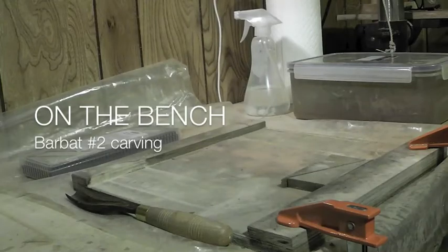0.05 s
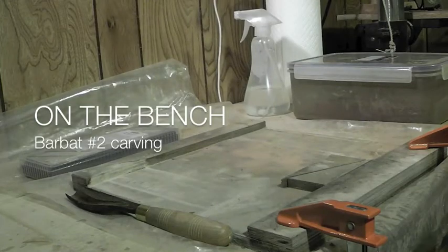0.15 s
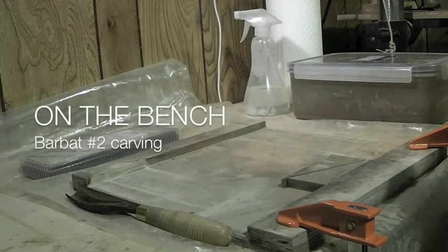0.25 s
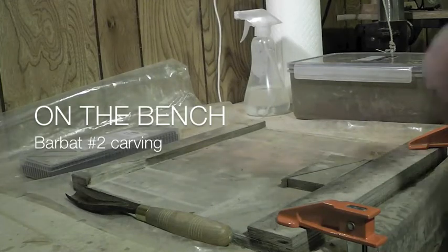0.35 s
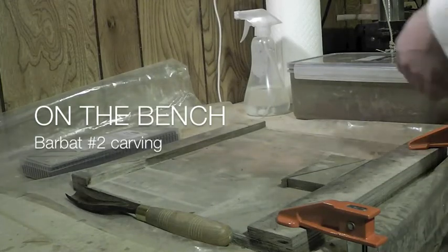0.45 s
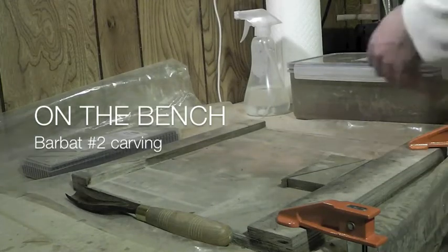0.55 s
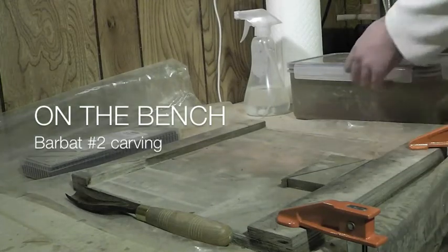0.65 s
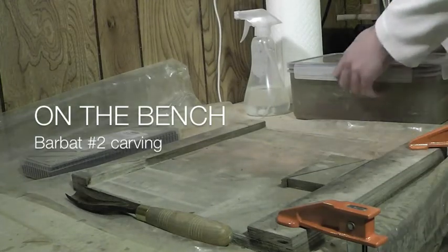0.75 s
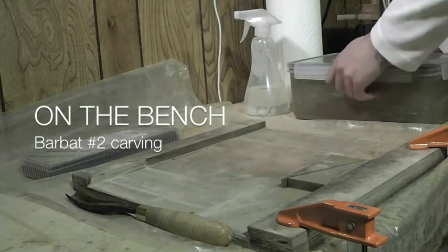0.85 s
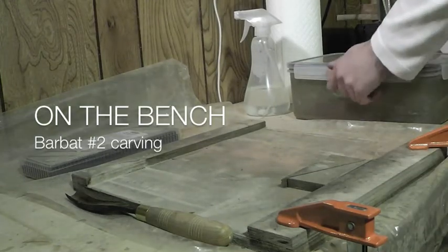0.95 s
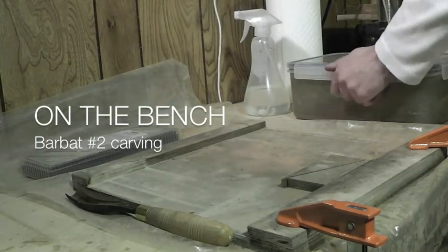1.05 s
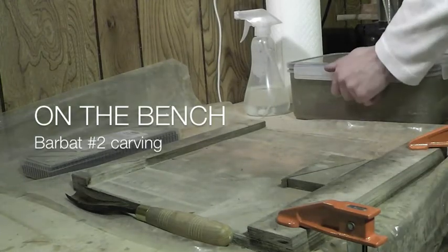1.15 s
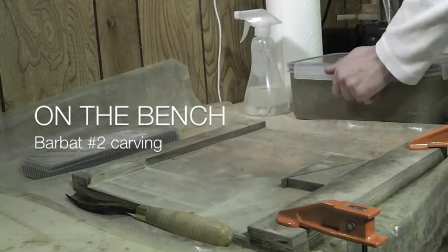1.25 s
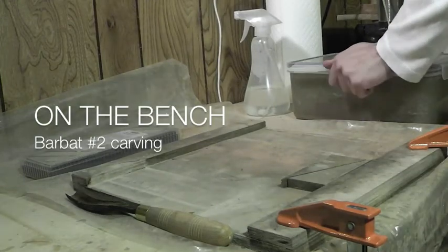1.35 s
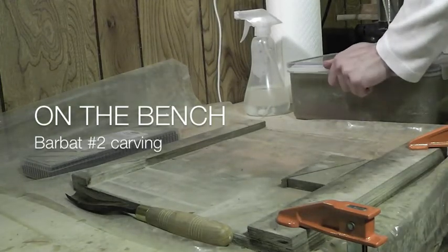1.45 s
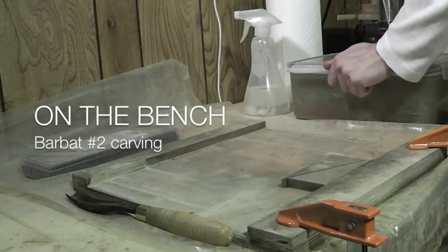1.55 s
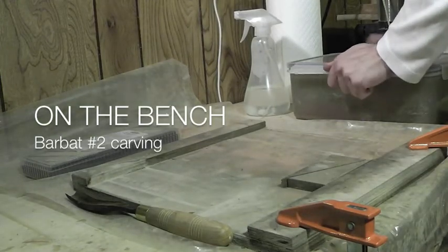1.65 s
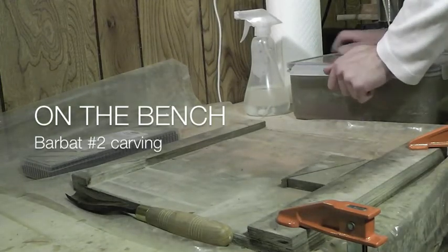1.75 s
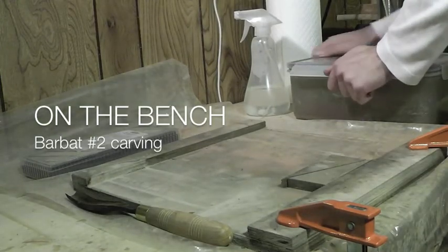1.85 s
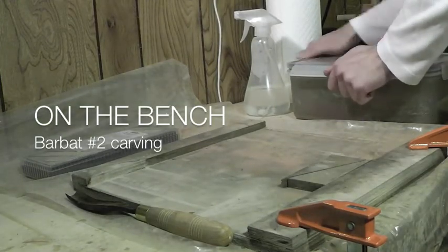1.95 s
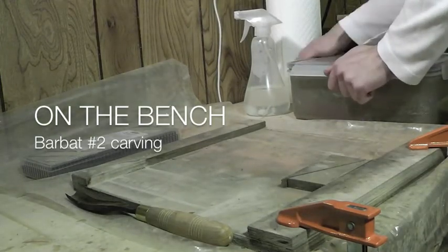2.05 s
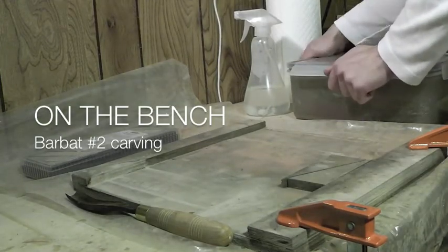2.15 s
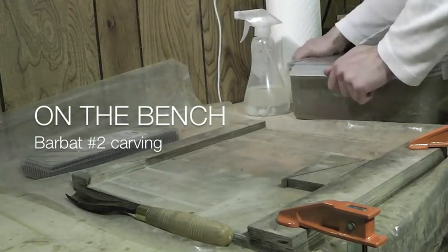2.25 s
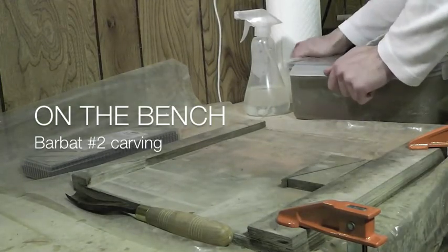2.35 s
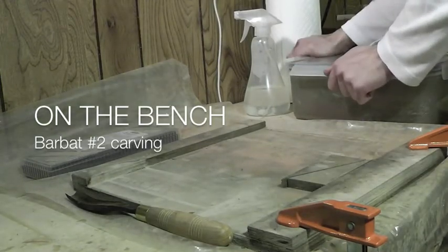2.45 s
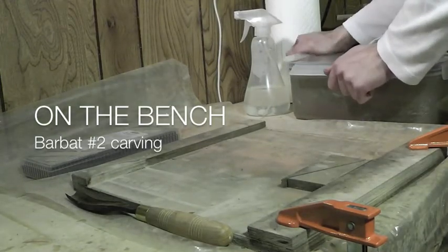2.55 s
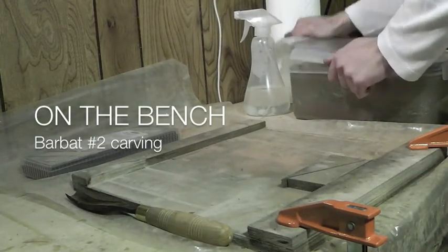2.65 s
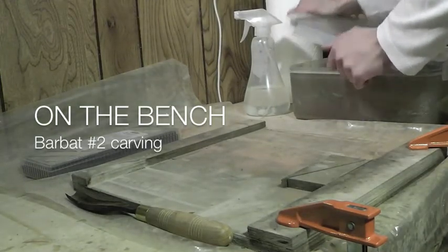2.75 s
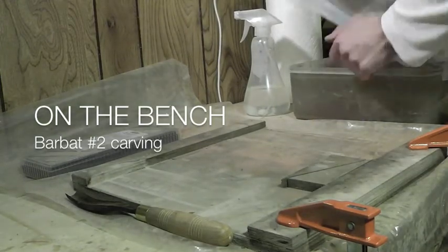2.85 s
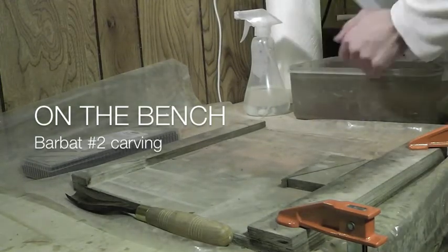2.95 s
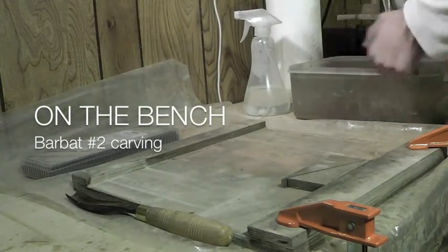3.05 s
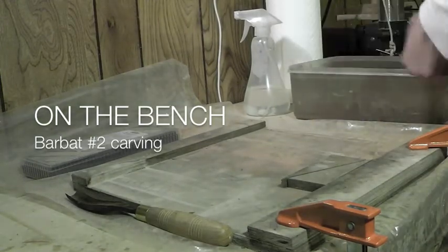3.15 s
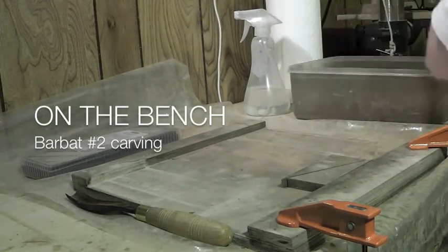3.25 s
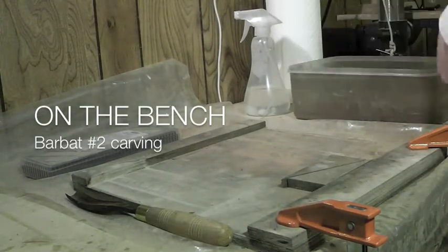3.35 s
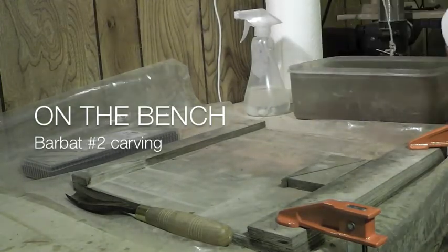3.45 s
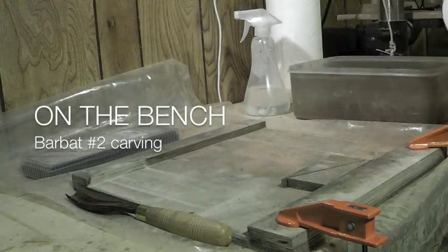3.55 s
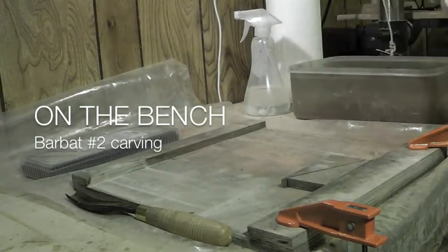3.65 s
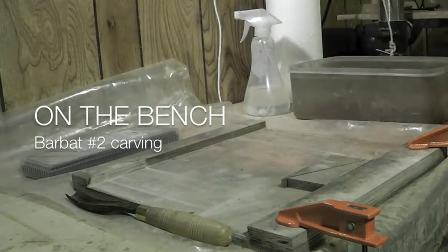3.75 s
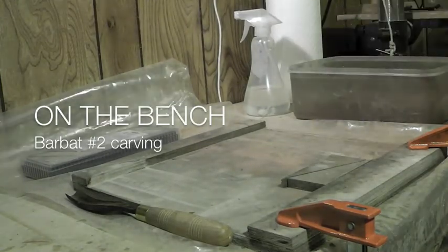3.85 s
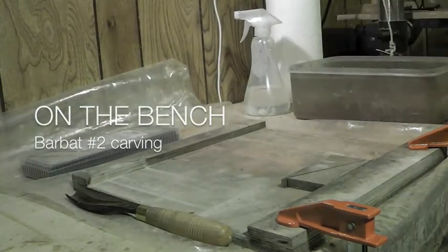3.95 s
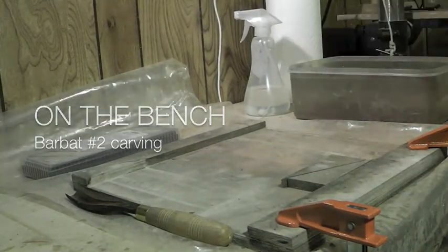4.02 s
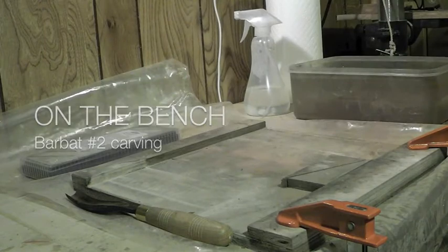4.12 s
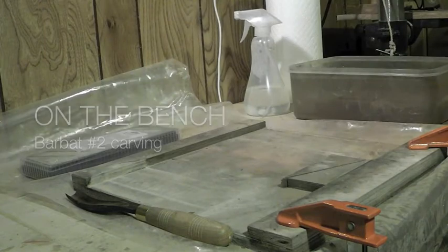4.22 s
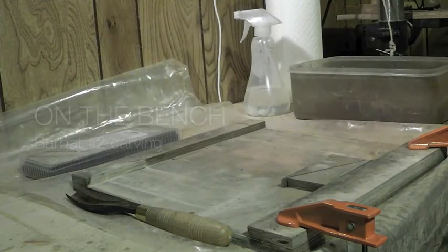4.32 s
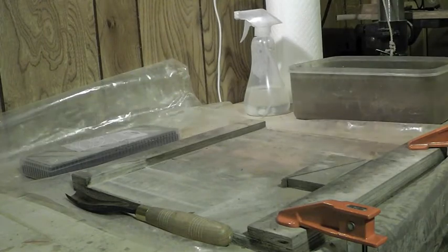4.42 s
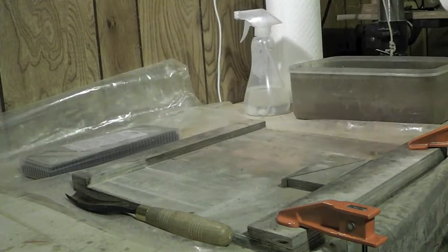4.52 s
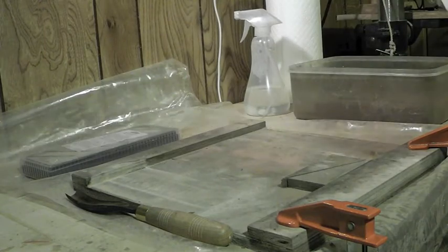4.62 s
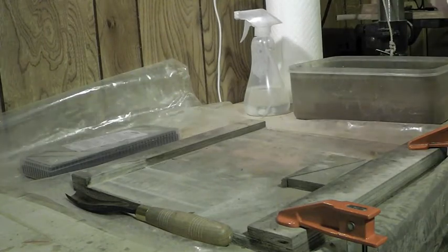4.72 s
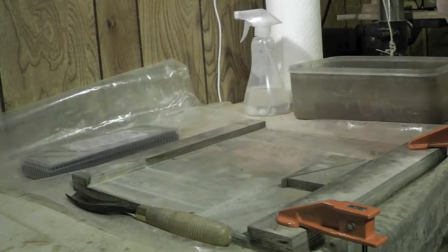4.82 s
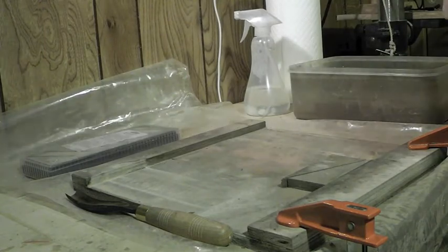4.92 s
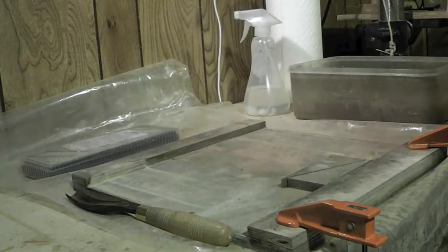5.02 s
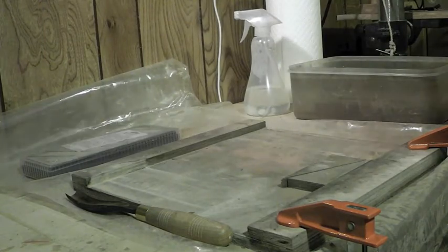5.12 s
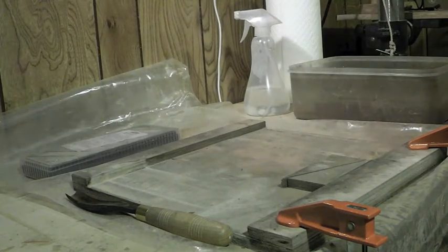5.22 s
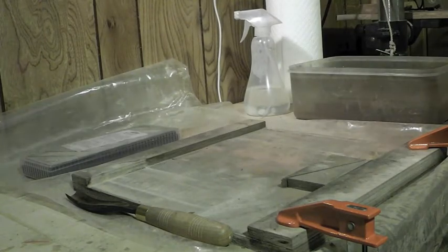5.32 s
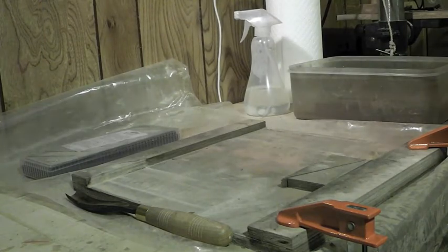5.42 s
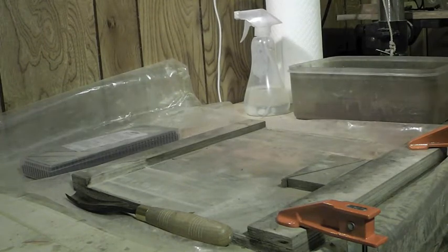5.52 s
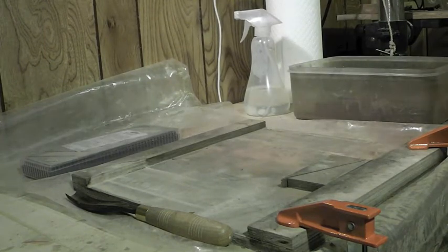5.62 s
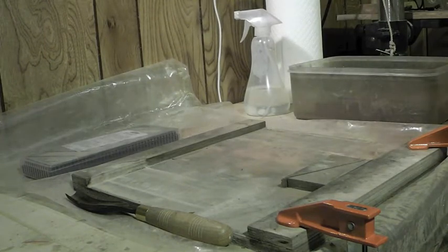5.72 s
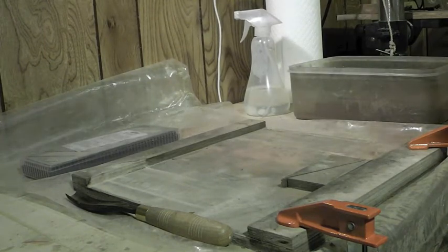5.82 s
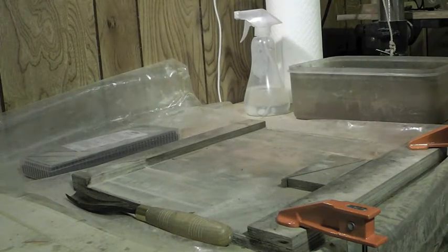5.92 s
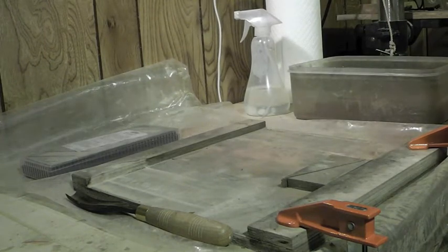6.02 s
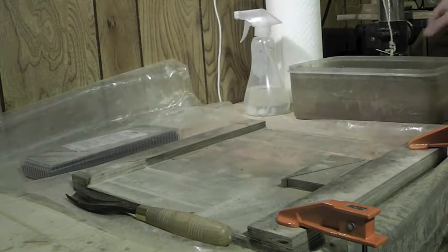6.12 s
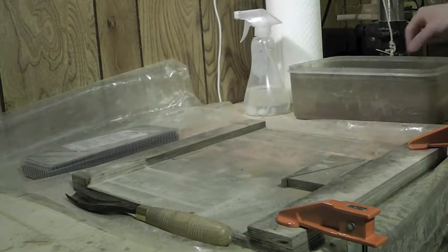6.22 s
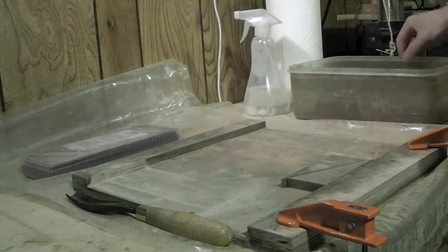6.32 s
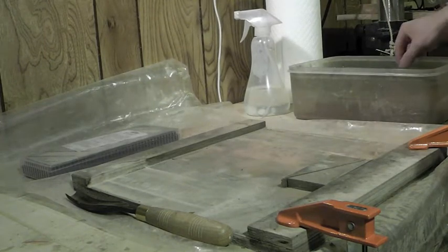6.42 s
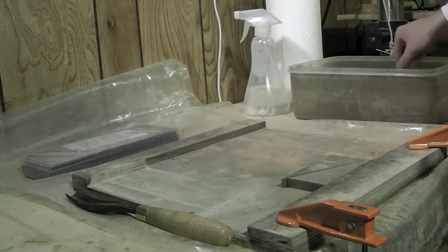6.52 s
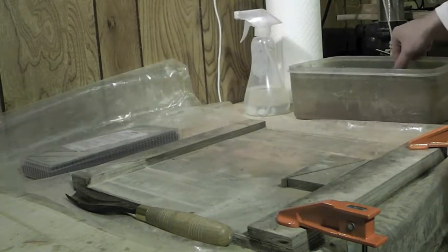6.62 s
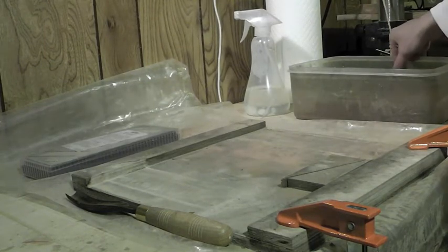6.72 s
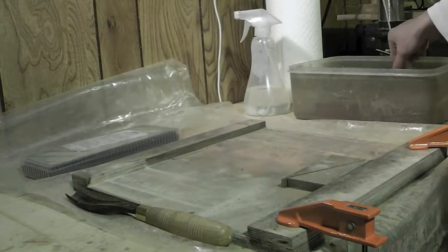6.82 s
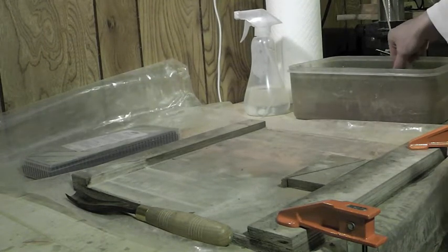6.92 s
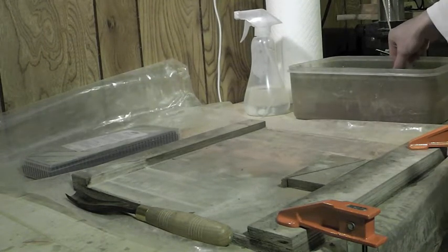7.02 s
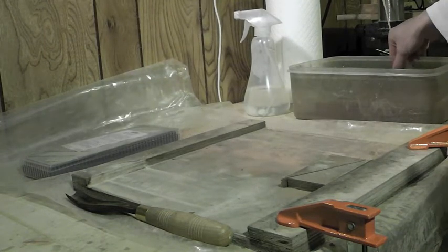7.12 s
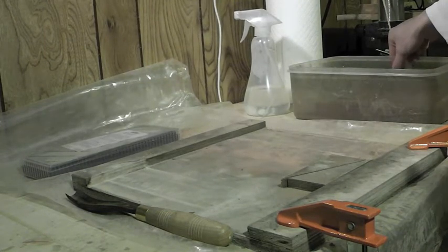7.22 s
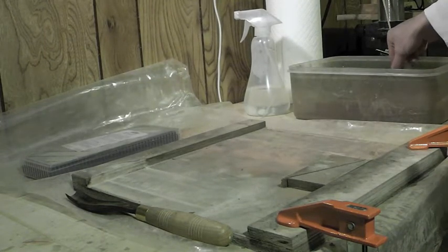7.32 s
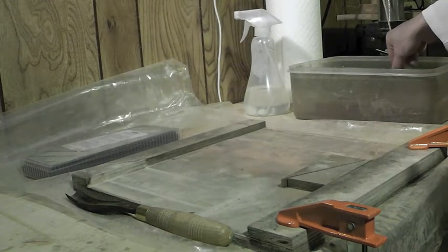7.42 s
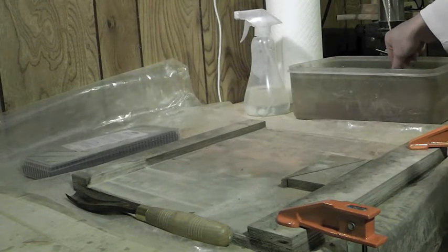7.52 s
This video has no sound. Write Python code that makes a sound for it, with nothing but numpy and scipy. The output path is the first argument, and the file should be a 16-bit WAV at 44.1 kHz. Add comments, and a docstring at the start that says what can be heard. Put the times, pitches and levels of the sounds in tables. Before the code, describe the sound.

Plastic box clips snap open sharply, then the lid scrapes off and clatters lightly down in a small, quiet room.

```python
"""A workshop bench: a plastic storage box's clips snap open, the lid scrapes off and is put down aside.
Each blow bends a plastic panel, rings the box and sprays a bright crack into a small wood-lined room.
Sliding plastic sticks and slips; sleeve fibres rustle as the arms move.
Behind it lie faint room noise and mains hum, and a low drone swells towards the end."""
import sys
import numpy as np
from scipy import signal
from scipy.fft import rfft, irfft, next_fast_len
from scipy.io import wavfile
from scipy.ndimage import uniform_filter1d

SR = 44100
rng = np.random.default_rng(int(sys.argv[2]) if len(sys.argv) > 2 else 0)


def inscribe(sig):
    """Save sig as 16-bit PCM at rate SR to the path in sys.argv[1].

    A 1-D sig is mono; a 2-D sig holds one channel per row.
    Samples are clipped to [-1, 1] before scaling.
    """
    pcm = np.round(np.clip(np.atleast_2d(sig).T, -1, 1) * 32767)
    wavfile.write(sys.argv[1], SR, pcm.astype(np.int16))


N = 334101

# bright crack of a contact: freq_hz, level_db
CRACK_SPECTRUM = [(800, -32.5), (2000, 2.5), (3000, -5.5), (4200, -4.5), (6500, -7.5), (10500, -3.5),
                  (12500, -11), (15500, -15.5)]


def clip_snaps():
    # start_s, knock_db, panel_hz, thump_db, thump_hz, clack_db, crack_db, after_db, slap_delay_s, aim_db
    snaps = [(1.319, 0, 714, -19.5, 247, -15, -26.5, -4, .026, -1),
             (1.390, 0, 620, -19.5, 232, -13, -27.5, -21, .012, 9.5),
             (2.330, -3, 690, -17, 176, -14.5, -20, -3, .016, 1)]
    release_hz, slap_hz, slip_db = 328.5, 275, -26
    rows = []
    for s, knock, panel_hz, thump, thump_hz, clack, crack, after, slap_delay_s, aim in snaps:
        spring_db, slap_db = after - 3.5, after - 8
        slip = (s - .0035, knock + slip_db, panel_hz, thump + slip_db, release_hz,
                clack + slip_db, crack - 18, 0)
        release = (s, knock, panel_hz, thump - 9, release_hz, clack, crack, aim)
        spring = (s + .006, knock + spring_db, panel_hz * .75, thump, thump_hz,
                  clack + spring_db, crack + after + 3, aim)
        slap = (s + slap_delay_s, knock + slap_db, panel_hz, thump + after + 1.5, slap_hz,
                clack + slap_db, crack + after - 13, aim)
        rows += [slip, release, spring, slap]
    return rows


def taps(panel_hz=660, hardness_db_per_octave=33, aim_db=2):
    """Light blows of fingers and lid; a harder contact clacks more and thumps higher."""
    # start_s, knock_db, thump_db, hardness_db, crack_db
    touches = [(0.358, -36, -44.5, -10, -76), (0.819, -32, -33.5, -27, -60),
               (0.842, -31.5, -36.5, -26.5, -66), (0.994, -39.5, -63, -8, -56), (1.126, -51, -59, 4, -59),
               (1.181, -42, -45.5, -3, -45), (1.194, -35, -43, -10, -68), (1.522, -24.5, -45, -32, -77),
               (2.143, -27, -43, -9, -44), (2.659, -52, -40.5, -7.5, -63), (2.679, -44, -54, -9, -46.5),
               (2.742, -46.5, -66, 6, -50), (2.782, -29.5, -68, -3.5, -43.5), (2.803, -43.5, -62, 6, -49),
               (2.839, -32.5, -47, -32, -59), (3.015, -20, -43.5, -12, -56), (3.034, -37, -58, -15, -43),
               (3.050, -32, -49, -8, -47), (3.078, -27, -39, -14.5, -50), (3.238, -28.5, -45.5, -7.5, -43),
               (3.551, -45.5, -62, -6, -62), (4.071, -44.5, -51.5, -1.5, -63),
               (5.412, -28, -63, -14.5, -65), (5.502, -41, -63, 2, -65)]
    rows = []
    for s, knock, thump, hardness, crack in touches:
        thump_hz = 269 * 2 ** (hardness / hardness_db_per_octave)
        rows.append((s, knock, panel_hz, thump, thump_hz, knock + hardness, crack, aim_db))
    return rows


def box_blows(contacts, ring_db=-50):
    """At each blow a panel swings, the whole box thumps and rings, the edges clack and crack."""
    # dull shove: freq_hz, level_db
    push_spectrum = [(30, -20), (85, -9.5), (125, -15), (165, 4.5), (250, -1), (370, -3.5), (600, -19.5),
                     (1500, -49)]
    # edge contact: freq_hz, level_db
    clack_spectrum = [(150, -20), (350, -2.5), (600, 0), (1050, 9.5), (1400, 7.5), (1800, -1.5),
                      (2250, -13.5), (2900, -21.5), (4000, -15), (6000, -21), (12000, -43.5)]
    out, ring = np.zeros((2, N)), box_ring()
    push, clack, crack = pulse(push_spectrum), pulse(clack_spectrum), pulse(CRACK_SPECTRUM)
    # panel and box radiate little below their lowest modes
    panel_highpass = signal.butter(3, 250, "high", fs=SR, output="sos")
    box_highpass = signal.butter(4, 140, "high", fs=SR, output="sos")
    for s, knock_db, panel_hz, thump_db, thump_hz, clack_db, crack_db, aim_db in contacts:
        dull = signal.sosfilt(box_highpass, amp(thump_db - 1) * swing(thump_hz, swell_s=.0031))
        knock = signal.sosfilt(panel_highpass, amp(knock_db - 3) * swing(panel_hz, swell_s=.00074))
        add(dull, 0, amp(thump_db + 17) * push)
        add(dull, .001, knock)
        for touch_s in (0, .0021 * rng.uniform(.7, 1.2)):  # the edge rebounds once
            add(dull, touch_s, amp(clack_db + 15) * clack)
        bright = np.zeros_like(dull)
        add(bright, 0, amp(crack_db + 16) * signal.fftconvolve(chatter(decay_s=.0033), crack))
        add(out, s, dull + amp(aim_db) * bright)  # aim: crack sent straight at the microphones
        add(out, s, amp(ring_db) * signal.fftconvolve(dull, ring))
        to_room = amp(-.5) * dull + amp(1) * bright  # the crack radiates sideways, so echoes more
        add(out, s, signal.fftconvolve(to_room[None], room_tail(), axes=1))
    return out


def box_ring():
    """Impulse response of the box with its trapped air."""
    # freq_hz, level_db, t60_s
    modes = [(168, -5, 0.32), (242.4, 1, 0.056), (280, -11, .18), (388, -3.5, 0.52), (452, -2.5, 0.39),
             (476, -2, 0.19), (601, -7, 0.39), (640, -6.5, 0.048), (717, -2, 0.35), (770, -10, 0.24),
             (947, 3, 0.37), (998, 1.5, 0.16), (1126, -4, 0.28), (1295, -10, 0.21), (1467, -3, 0.23),
             (2486, -1, 0.26), (2735, 5.5, .22)]
    t = np.arange(SR // 2) / SR
    return sum(amp(db - 60 * t / t60_s) * np.cos(2 * np.pi * hz * t) for hz, db, t60_s in modes)


def lid_landing():
    """The lid's hard rim clicks down further off, then its face clatters."""
    # touchdowns: start_s, level_db
    impacts = [(5.222, -31), (5.225, -22)]
    # lid face: freq_hz, density_db
    face_spectrum = [(88, -31), (150, -13), (314, -27.5), (359, -4.5), (487, -12), (545, 2.5), (812, -11.5),
                     (982, -2), (1160, -6.5), (1800, -11), (3370, -30.5), (4750, -27.5), (14000, -62)]
    # lid rim: freq_hz, level_db
    rim_spectrum = [(400, -38), (1000, -1), (1700, 9), (2800, -16), (4500, -7), (7000, -32), (12000, -29)]
    out, face = np.zeros((2, N)), pulse(face_spectrum)
    for s, db in impacts:
        clatter = amp(db + 15) * signal.fftconvolve(chatter(decay_s=.0064), face)
        add(out, s, with_echoes(clatter, room_db=1))
    s, db = impacts[0]
    add(out, s, with_echoes(amp(db + 13) * pulse(rim_spectrum), room_db=2.5))
    return out


def plastic_slides(ring_db=-54):
    """Fingers, clip and rim stick and slip; the slips ring the box and the lid flexes."""
    # plastic sliding: peak_s, level_db, rise_s, fall_s
    slide_strokes = [(0.362, -52.5, 0.063, .05), (0.822, -46.5, 0.044, 0.086), (1.004, -51.5, 0.055, 0.028),
                     (2.144, -50, 0.19, 0.17), (2.317, -43.5, 0.011, .025), (2.658, -39.5, 0.056, 0.031),
                     (2.785, -38.5, .075, 0.027), (3.06, -41, .05, 0.08), (5.28, -43.5, 0.025, 0.1),
                     (5.42, -46.5, 0.13, 0.12), (5.506, -46, 0.14, .17)]
    # freq_hz, density_db
    slide_spectrum = [(88, -45.5), (150, -7.5), (298, -6), (456, -10), (546, 1.5), (661, -8.5),
                      (1470, -9.5), (2580, -27), (4000, -37.5), (5200, -46), (8800, -120)]
    rub_strokes = [(1.005, -49, .016, .035)]
    # freq_hz, density_db
    rub_spectrum = [(900, -34.5), (1450, -7.5), (1900, -0.5), (2150, -4.5), (2500, -32), (5000, -43)]
    # flexing plastic sings: start_s, level_db, pitch_hz, swell_s
    flexes = [(2.657, -32.5, 326, 0.0027), (2.741, -38.5, 560, 0.0079), (2.780, -26, 592, 0.005),
              (3.240, -34, 406, 0.0035), (5.408, -38.5, 561, 0.01)]
    slips = tinted(grains(per_s=700, spread_db=1), slide_spectrum) * strokes(slide_strokes) * amp(-2)
    rub = tinted(grains(per_s=2900, spread_db=1.5), rub_spectrum) * strokes(rub_strokes)
    ring = amp(ring_db) * signal.oaconvolve(slips, box_ring())[:N]
    out = rub + in_room(slips + ring, room_db=.5)
    for s, db, hz, swell_s in flexes:
        add(out, s, with_echoes(amp(db) * swing(hz, swell_s), room_db=-7))
    return out


def sleeves(folds_db=2.5):
    """Cloth fibres hiss and tick as the arms move; folds catch and let go."""
    # arm movements: peak_s, level_db, rise_s, fall_s
    arm_strokes = [(0.55, -63.5, 1.5, 0.74), (0.845, -54.5, 0.14, 0.11), (0.96, -62.5, 0.22, .5),
                   (1.757, -48.5, 0.093, 0.041), (1.95, -53, 0.41, 0.22), (2.14, -50, 0.18, 0.082),
                   (2.68, -57.5, 0.21, 0.088), (2.76, -45, 0.091, 0.047), (3.03, -57, 0.51, 0.23),
                   (3.4, -62, 0.28, 0.028), (3.465, -55.5, 0.033, 0.05), (3.65, -56.5, 0.31, 0.39),
                   (4.075, -57.5, 0.25, .055), (4.17, -59.5, 0.059, 0.16), (4.32, -61.5, 0.18, .14),
                   (5.45, -50.5, 0.18, 0.16), (5.97, -64.5, 0.33, 0.11)]
    # freq_hz, density_db
    cloth_spectrum = [(180, -39), (300, -3), (454, -4.5), (582, 3), (911, -8), (1010, -1), (1170, -9),
                      (1770, -4), (3160, -27.5), (3990, -11), (7010, -12), (11000, -9.5), (15800, -17.5)]
    # cloth sweeping fast over plastic: peak_s, level_db, rise_s, fall_s
    sweeps = [(1.895, -50.5, 0.11, 0.23), (2.005, -55, 0.16, 0.046), (4.02, -63.5, .12, 0.35)]
    # freq_hz, density_db
    sweep_spectrum = [(4000, -20), (8000, -7), (11000, -2), (13000, -3.5), (15800, -15)]
    # cuff and fingers: start_s, level_db
    ticks = [(3.1807, -52), (3.4521, -63), (3.8194, -52), (4.27, -52), (4.3804, -44)]
    folds = unit(uniform_filter1d(uniform_filter1d(rng.standard_normal(N), size=700), size=500))
    fibres = tinted(grains(per_s=7400, spread_db=.5), cloth_spectrum)
    cloth = fibres * strokes(arm_strokes) * amp(folds_db * folds - 1)
    cloth += tinted(rng.standard_normal(N), sweep_spectrum) * strokes(sweeps) * amp(1)
    for s, db in ticks:
        add(cloth, s, amp(db + 13) * signal.fftconvolve(chatter(decay_s=.0027), pulse(CRACK_SPECTRUM)))
    return in_room(cloth, room_db=.5)


def drone(start_s=4.74, swell_s=.97, full_db=-55):
    """Noise in a few low, narrow resonances swells up."""
    # centre_hz, width_hz, level_db
    resonances = [(83.4, 20, -4.5), (167, 36, -1.5), (194.2, 4.2, -2.5), (254, 13, -1), (433, 44, -18.5),
                  (580, 13, -8), (697, 87, -16.5), (970, 83, -27)]
    size = next_fast_len(N)
    shape = sum(amp(db) / (1 + ((bins(size) - hz) / width_hz * 2) ** 2) for hz, width_hz, db in resonances)
    noise = unit(irfft(rfft(rng.standard_normal(size)) * shape, size)[:N])
    running_s = np.maximum(np.arange(N) / SR - start_s, 0)
    return noise * amp(full_db) * (1 - np.exp(-running_s / swell_s))


def room_noise(noise_db=-56, hum_hz=60, hum_db=-70.5):
    """Steady noise with a trace of mains hum."""
    # freq_hz, density_db
    noise_spectrum = [(12, -24.5), (20, -7), (65, -7.5), (90, -17.5), (145, -14.5), (167, -9.5),
                      (247, -11.5), (375, -19), (586, -15), (775, -18.5), (843, -17.5), (1890, -25),
                      (2430, -39), (5950, -33), (15800, -38)]
    # left to right: freq_hz, correlation
    noise_coherence = [(60, 0.73), (250, 0.19), (700, -0.085), (1500, -0.48), (6000, -0.23), (12000, -0.25)]
    noise = tinted(mic_pair(rng.standard_normal((2, N)), noise_coherence), noise_spectrum)
    hum = np.sqrt(2) * np.sin(2 * np.pi * hum_hz * np.arange(N) / SR)
    return amp(noise_db) * noise + amp(hum_db) * hum


def room_tail(gap_s=.0036, build_s=.0018, early_s=.025):
    """Dense echoes: strong ones from bench and wall first, then each band dies at its own rate."""
    # freq_hz, t60_s
    decay_times = [(100, 0.61), (250, .36), (700, .42), (1800, 0.43), (4000, 0.44), (8000, .26),
                   (14000, 0.23)]
    # left to right: freq_hz, correlation
    echo_coherence = [(100, .98), (600, .98), (2000, .95), (4000, .85), (7000, .74), (10500, .66),
                      (12000, .3), (15000, .35)]
    t = np.arange(SR // 3) / SR
    echoes = rng.choice([-1., 1.], (2, len(t))) * (rng.random((2, len(t))) < .25)
    hz, frame_s, bands = signal.stft(mic_pair(echoes, echo_coherence), SR, nperseg=256)
    decay = np.exp(-np.log(1000) * frame_s / read(decay_times, hz)[:, None])
    tail = signal.istft(bands * decay, SR, nperseg=256)[1][:, :len(t)]
    near_walls = 1 + 4.1 * np.exp(-t / early_s)
    tail = tail * np.clip((t - gap_s) / build_s, 0, 1) * near_walls
    return tail / np.linalg.norm(tail[0])


def in_room(x, room_db):
    """A full-length layer with its echoes, at the same power."""
    wet = signal.oaconvolve(x[None], room_tail(), axes=1)[:, :N]
    return (x + amp(room_db) * wet) / np.hypot(1, amp(room_db))


def with_echoes(sound, room_db):
    """A short sound in stereo; each place on the bench has its own echoes."""
    both = amp(room_db) * signal.fftconvolve(sound[None], room_tail(), axes=1)
    add(both, 0, sound)
    return both


def off_centre(x):
    """From one side, treble reaches the two microphones with unequal level and phase."""
    # freq_hz, left_minus_right_db
    balance = [(100, .7), (1000, .4), (4500, 0), (8500, -2), (11500, -5.5), (14000, 1)]
    # freq_hz, left_lead_rad
    phase_lead = [(3000, 0), (11400, -.2), (12400, 1.9), (13500, 1.9), (15500, 0)]
    size = next_fast_len(N)
    half = amp(read(balance, bins(size)) / 2) * np.exp(.5j * read(phase_lead, bins(size)))
    return irfft(rfft(x, size) * np.array([half, 1 / half]), size)[:, :N]


def mic_pair(x, coherence):
    """Correlates two independent signals, as two close microphones hear a diffuse field."""
    size = next_fast_len(x.shape[1])
    left, other = rfft(x, size)
    correlation = np.clip(read(coherence, bins(size)), -1, 1)
    right = correlation * left + np.sqrt(1 - correlation ** 2) * other
    return irfft(np.array([left, right]), size)[:, :x.shape[1]]


def swing(hz, swell_s):
    """A panel's vibration peaks at swell_s and dies away."""
    t = np.arange(4096) / SR
    return t / swell_s * np.exp(1 - t / swell_s) * np.sin(2 * np.pi * hz * t)


def chatter(decay_s, rise_s=.0008):
    """A contact closes and rattles briefly; energy 1."""
    t = np.arange(2048) / SR
    burst = rng.standard_normal(len(t)) * np.exp(-t / decay_s) * (1 - np.exp(-t / rise_s))
    return burst / np.linalg.norm(burst)


def grains(per_s, spread_db):
    """Random tiny slips of uneven size; rms 1."""
    size = amp(spread_db * np.minimum(rng.exponential(1, N), 4))
    return unit(size * rng.standard_normal(N) * (rng.random(N) < per_s / SR))


def strokes(rows, drop_db=19.5, roundness=1.26):
    """Gain of strokes that speed up, peak and slow; overlaps add in power."""
    t, power = np.arange(0, N, 32) / SR, 0
    for peak_s, db, rise_s, fall_s in rows:
        away = np.maximum((peak_s - t) / rise_s, (t - peak_s) / fall_s)
        power = power + amp(db - drop_db * away ** roundness) ** 2
    return np.interp(np.arange(N) / SR, t, np.sqrt(power))


def pulse(spectrum, size=2048):
    """Minimum-phase pulse with this spectrum; energy 1."""
    log_gain = np.log(amp(read(spectrum, abs(np.fft.fftfreq(size, 1 / SR)))))
    response = np.fft.ifft(np.exp(np.conj(signal.hilbert(log_gain)))).real
    return response / np.linalg.norm(response)


def tinted(x, spectrum):
    """Filters by a spectrum; rms 1."""
    size = next_fast_len(N)
    return unit(irfft(rfft(x, size) * amp(read(spectrum, bins(size))), size)[..., :N])


def read(points, hz):
    """Interpolates a table over log frequency."""
    point_hz, value = np.transpose(points)
    return np.interp(np.log(hz + 1), np.log(point_hz + 1), value)


def add(mix, start_s, sound):
    part = mix[..., round(start_s * SR):][..., :sound.shape[-1]]
    part += sound[..., :part.shape[-1]]


def amp(db):
    return 10 ** (np.asarray(db) / 20)


def unit(x):
    return x / np.sqrt(np.mean(x ** 2) + 1e-20)


def bins(size):
    return np.fft.rfftfreq(size, 1 / SR)


def scene():
    """The box is handled over the workshop's background."""
    handling = box_blows(clip_snaps() + taps()) + lid_landing() + plastic_slides() + sleeves()
    return off_centre(handling) + room_noise() + drone()


def record(dry, ceiling=.96, cutoff_hz=15900):
    """Rounds off peaks near full scale, then limits the band."""
    rounded = dry / (1 + (dry / ceiling) ** 8) ** (1 / 8)
    lowpass = signal.firwin(511, cutoff_hz, window=("kaiser", 9), fs=SR)
    return signal.oaconvolve(rounded, lowpass[None], "same")


dry = scene()
out = record(dry)
inscribe(out)
```